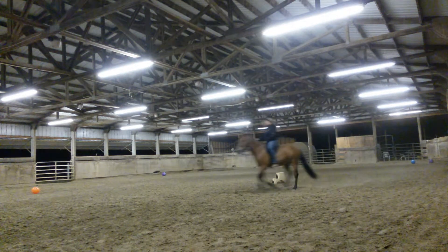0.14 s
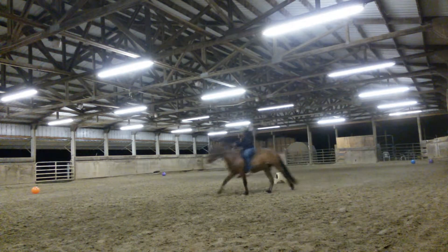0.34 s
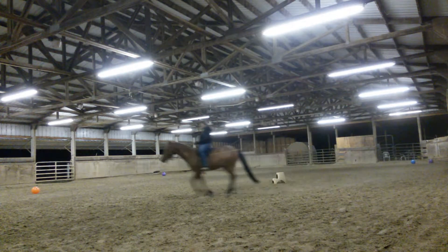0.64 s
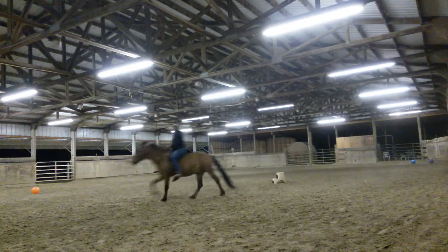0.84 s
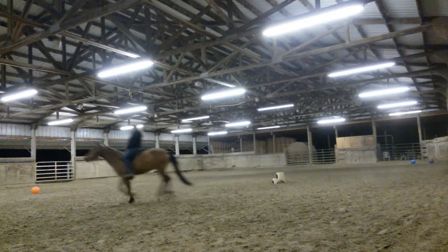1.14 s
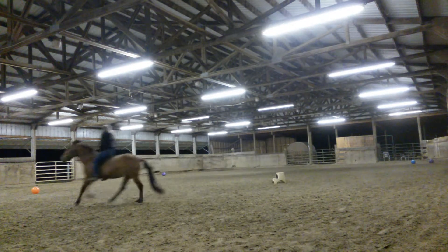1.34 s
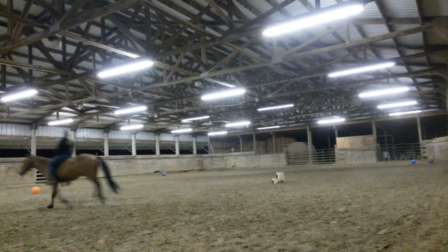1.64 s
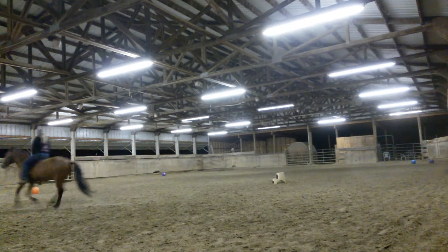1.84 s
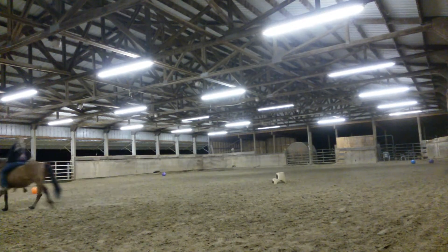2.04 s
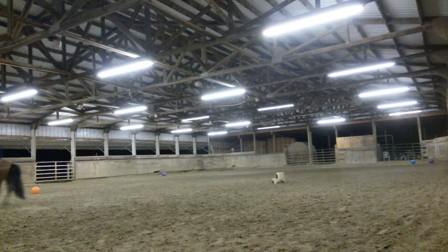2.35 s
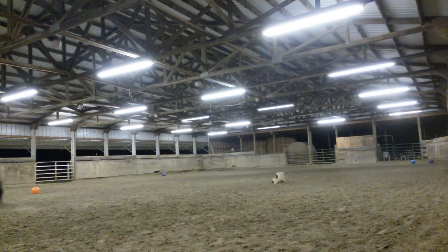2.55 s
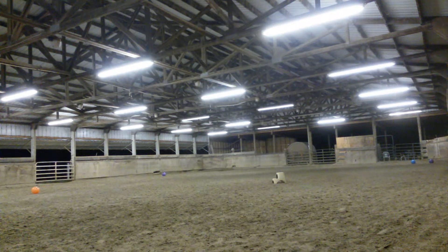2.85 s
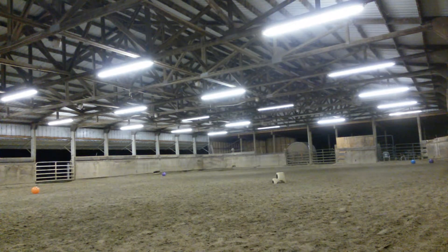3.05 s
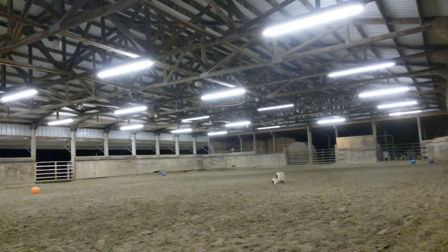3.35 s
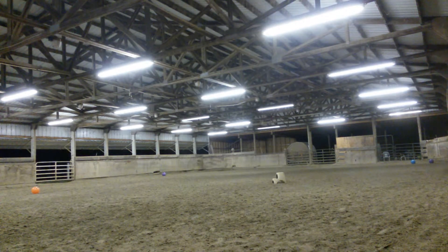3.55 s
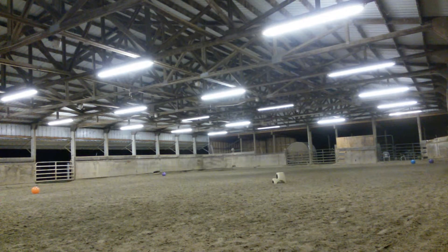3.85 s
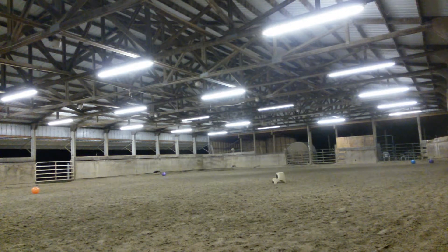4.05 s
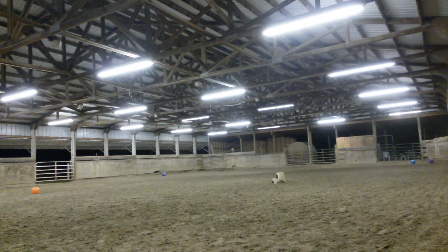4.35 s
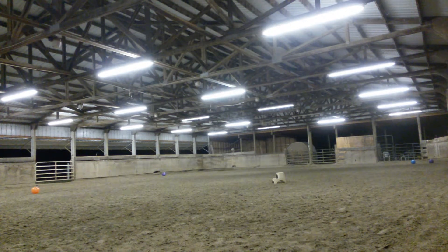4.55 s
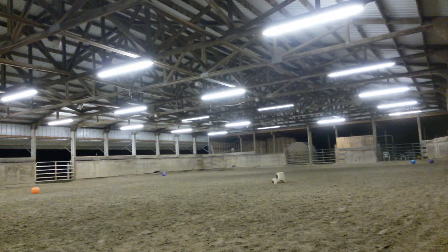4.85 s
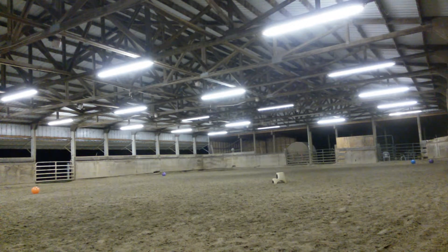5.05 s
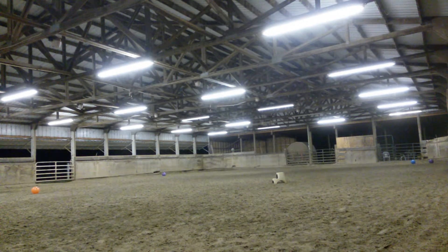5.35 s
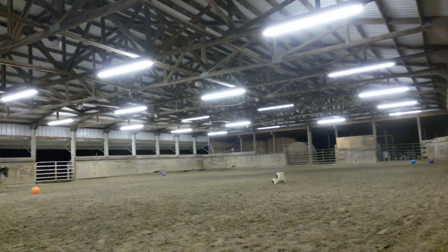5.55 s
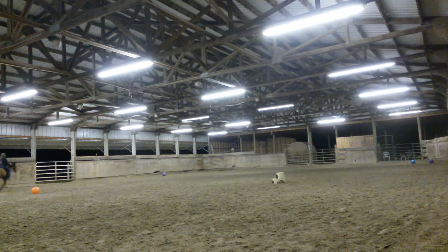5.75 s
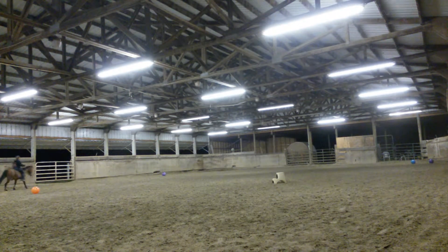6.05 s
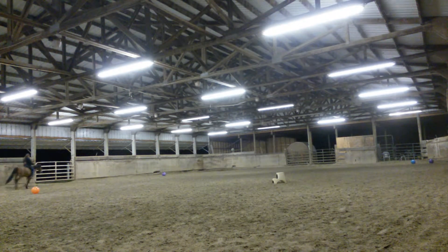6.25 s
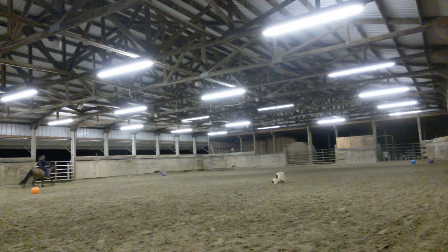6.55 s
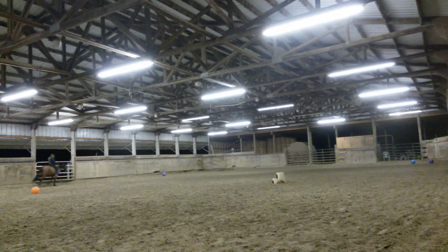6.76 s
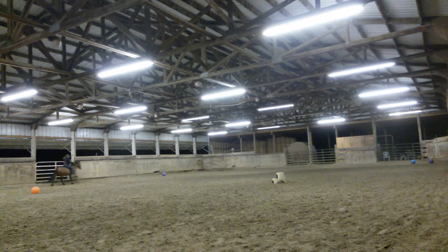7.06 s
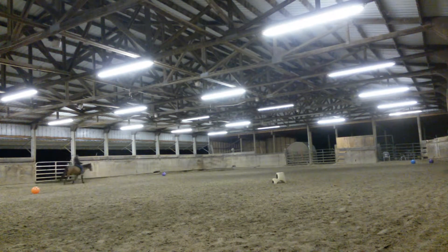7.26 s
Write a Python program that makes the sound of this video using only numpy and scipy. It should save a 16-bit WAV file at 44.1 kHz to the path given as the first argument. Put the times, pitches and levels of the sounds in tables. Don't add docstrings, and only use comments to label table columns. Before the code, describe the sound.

Soft, dull hoof thuds and gritty dirt spray pass close by with a bright metallic tack rattle, fade, then return fainter in an indoor arena.

```python
import sys
import numpy as np
from scipy import signal
from scipy.fft import rfft, irfft, next_fast_len
from scipy.io import wavfile
from scipy.ndimage import uniform_filter1d

SR = 44100
rng = np.random.default_rng(int(sys.argv[2]) if len(sys.argv) > 2 else 0)


def bounce(signal):
    frames = np.transpose(np.atleast_2d(signal))
    limited = np.clip(frames, -1, 1)
    pcm = np.round(limited * 32767).astype(np.int16)
    wavfile.write(sys.argv[1], SR, pcm)


def nominal_scale(level):
    x = np.asarray(level, float) / 20
    return 10 ** x


N = 326011

# (frequency [Hz], level [dB])
SCUFF_COLOUR = [(150, 3.5), (400, 7.5), (1000, 3), (2500, -2), (5000, -2.5), (9000, -8.5), (15000, -23)]
# (frequency [Hz], level [dB])
SPRAY_COLOUR = [(1500, -12.5), (3000, -6), (6000, -2), (10000, -2.5), (15000, 3)]


def level(x, db):
    return x * nominal_scale(db) / np.sqrt(np.mean(x ** 2))


def colour(x, points):
    hz, db = np.transpose(points)
    size = next_fast_len(N + 4096)
    f = np.maximum(np.arange(size // 2 + 1) * SR / size, 1)
    gain = nominal_scale(np.interp(np.log(f), np.log(hz), db))
    return irfft(rfft(x, size) * gain, size)[..., :N]


def band(x, lo_hz, hi_hz):
    return signal.sosfilt(signal.butter(2, [lo_hz, hi_hz], "band", fs=SR, output="sos"), x)


def add(out, s, x):
    i = max(int(s * SR), 0)
    out[..., i:i + x.shape[-1]] += x[..., :max(out.shape[-1] - i, 0)]


def clock(seconds):
    return np.arange(int(seconds * SR)) / SR


def alike(count, hz):
    mid, side = rng.standard_normal((2, count))
    treble = signal.sosfilt(signal.butter(2, hz, "high", fs=SR, output="sos"), side)
    side = 0.39 * side + 0.7 * treble
    return np.array([mid + side, mid - side])


def grit(scatter_db, share):
    sizes = nominal_scale(scatter_db * rng.exponential(size=N)) * (rng.random(N) < share)
    return level(uniform_filter1d(sizes, 24) * rng.standard_normal((2, N)), 0)


def bursts(s, lasts, db, rise, sag, fall):
    step_s = np.arange(0, N, 32) / SR
    since = step_s - np.asarray(s)[:, None]
    held = np.clip(since, 0, np.asarray(lasts)[:, None])
    falling = np.maximum(since, 0) - held
    sag = np.reshape(sag, (-1, 1))
    gain = nominal_scale(db[:, None] + rise * np.minimum(since, 0) - sag * held - fall * falling)
    return np.interp(np.arange(N) / SR, step_s, np.sqrt(np.sum(gain ** 2, axis=0)))


def hall(x, wet_db, builds_s=0.0028):
    t60_s, treble_t60_s = 0.92, 0.31
    t = clock(1.2)
    noise = alike(len(t), 610)
    low = signal.sosfilt(signal.butter(1, 1500, fs=SR, output="sos"), noise)
    tail = low * nominal_scale(-60 * t / t60_s) + (noise - low) * nominal_scale(-60 * t / treble_t60_s)
    tail = tail * np.minimum(t / builds_s, 1)
    tail = tail / np.sqrt(np.sum(tail ** 2, axis=1, keepdims=True))
    return x + nominal_scale(wet_db) * signal.fftconvolve(x, tail, axes=1)[:, :N]


def push(hz, lead_s):
    turn = (clock(.03) - lead_s) * hz
    return np.cos(2 * np.pi * turn + .5) * np.exp(-(turn / (.44 * np.sqrt(hz / 100))) ** 2)


def hoofs():
    # (time [s], peak [dB], thud pitch [Hz], carry of the flutter [dB], hard edge [dB])
    near_falls = [(0.009, -37.5, 203, -4, -7), (0.051, -36.5, 96.9, 20, -18), (0.119, -44, 87, 8, -14),
                  (0.374, -35.5, 111, -3, -12), (0.5, -33.5, 103, -3, -6.5), (0.804, -46, 88.8, 2, -13),
                  (0.923, -30.5, 109, 13, -7.5), (1.261, -48, 112, 9, -4), (1.373, -45.5, 94.5, -3, -2),
                  (1.503, -30, 192, 0, -13), (1.633, -41.5, 85.6, 2, -4.5), (1.944, -47.5, 96.9, 0.5, -0.5),
                  (2.069, -36.5, 115, 1, -9), (2.209, -33, 186, -2.5, -12.5), (2.524, -34.5, 186, -1, -15),
                  (2.636, -38.5, 101, -6.5, -2), (3.222, -49, 245, 15, -7), (3.35, -43, 105, 12, -11),
                  (3.784, -54, 182, 3, -19), (3.886, -50, 108, 1, -14)]
    # (time [s], peak [dB], thud pitch [Hz], carry of the flutter [dB], hard edge [dB])
    far_falls = [(4.38, -45, 240, 7, -12), (4.522, -46, 79, 12, -11), (4.798, -48.5, 77, 6, -13),
                 (4.931, -39.5, 110, 13, -28), (5.082, -36, 95, 18, -13), (5.131, -42.5, 220, 1, -17),
                 (5.213, -45.5, 89.5, 21, -20), (5.369, -41.5, 167, 10, -25), (5.52, -46, 97, 0, -9),
                 (5.659, -36.5, 165, 6, -12), (5.781, -46.5, 100, 8, -14), (5.943, -40, 124, 12, -12.5),
                 (6.082, -40, 172, 16, -11.5), (6.237, -39.5, 182, 5.5, -16), (6.528, -46.5, 169, 1, -13),
                 (6.641, -34, 197, 5, -11.5), (6.68, -36, 166, -1.5, -10.5), (6.791, -36.5, 103, -3, -16),
                 (6.848, -49, 157, 31, -11), (7.081, -41.5, 230, 4, -13), (7.12, -50.5, 171, 5, -3),
                 (7.227, -42.5, 117, -12, -1.5)]
    roof_s, roof_db = 0.0102, 6.5
    falls = near_falls + far_falls
    body, flutter, crisp = np.zeros((3, N))
    t = clock(.15)
    crunch = np.minimum(t / 0.0031, 1) * np.exp(-t / 0.019)
    edge = push(338, lead_s=0.00803) + nominal_scale(-6.5) * push(615, lead_s=0.0087)
    for (s, db, hz, carry_db, edge_db), luck in zip(falls, rng.standard_normal((len(falls), 16))):
        thud = push(hz, lead_s=0.00804) + nominal_scale(edge_db) * edge
        add(body, s - .005, nominal_scale(db - 5.5) * thud)
        for k in range(6):
            uneven = k > 0
            late = roof_s * (k + 1) + 0.0019 * luck[k + 8] * uneven
            return_db = db - 7.5 + roof_db + 0.82 * luck[k] * uneven + min(carry_db - 9.5 * k, 0)
            add(flutter, s - .005 + late, nominal_scale(return_db) * thud)
        far_db = -1 if s >= far_falls[0][0] else 0
        add(crisp, s, nominal_scale(-59.5 + 0.76 * (db + 37.0) + far_db) * crunch)
    crisp = crisp * level(band(alike(N, 930), 340, 800), 0)
    return hall(body + crisp, -2.5, builds_s=0.043) + flutter


def clods():
    # (time [s], peak [dB], pitch [Hz], fade [s])
    breaks = [(0.243, -46, 2140, 0.055), (0.382, -50, 961, 0.06), (0.498, -53, 929, 0.06),
              (0.669, -47, 899, 0.067), (0.777, -46, 834, 0.065), (0.807, -42.5, 1970, 0.06),
              (0.92, -53, 1950, 0.055), (1.016, -48, 1220, 0.06), (1.169, -43, 1080, 0.067),
              (1.235, -44.5, 2200, 0.068), (1.506, -39, 1200, 0.069), (1.705, -56, 896, 0.06),
              (1.818, -57, 1260, 0.055), (1.882, -46, 2700, 0.055), (1.945, -58, 1010, 0.054),
              (2.057, -60, 1120, 0.06), (2.438, -52, 2780, 0.06), (3.028, -50, 802, 0.068),
              (3.096, -46, 2460, 0.065), (3.21, -59, 905, 0.074), (3.789, -61, 802, 0.06),
              (3.938, -52, 1470, 0.06), (4.413, -52, 1140, 0.06), (4.806, -61, 1070, 0.06)]
    # (time [s], peak [dB], pitch [Hz], t60 [s])
    thumps = [(0.376, -37, 315, 0.072), (0.453, -51, 253, 0.06), (0.501, -46, 217, 0.05),
              (0.749, -49, 323, 0.06), (0.924, -46, 345, 0.052), (1.015, -45, 285, 0.069),
              (1.288, -56, 280, 0.06), (1.38, -44, 221, 0.069), (1.513, -42, 250, 0.054),
              (1.632, -46, 366, 0.06), (1.952, -55, 405, 0.055), (2.08, -40.5, 287, 0.068),
              (2.206, -36, 222, 0.079), (2.249, -47, 238, 0.06), (2.524, -49, 221, 0.054),
              (2.564, -52, 242, 0.06), (2.627, -41, 226, 0.065), (2.732, -53, 253, 0.06),
              (3.219, -52, 248, 0.06), (3.785, -56, 240, 0.067), (3.833, -52, 245, 0.06),
              (4.362, -49, 229, 0.06), (4.932, -51, 256, 0.06), (4.963, -52, 242, 0.06),
              (5.087, -40, 260, 0.073), (5.652, -54, 221, 0.06), (5.689, -47, 237, 0.06),
              (5.958, -51, 291, 0.06), (6.081, -48, 224, 0.06), (6.252, -48, 221, 0.06),
              (6.531, -55, 221, 0.06), (6.652, -42, 254, 0.066), (6.752, -51, 240, 0.06),
              (6.799, -49, 242, 0.06), (7.091, -45, 240, 0.06), (7.233, -42, 270, 0.069)]
    out = np.zeros((2, N))
    t = clock(.12)
    for (s, db, hz, fade), crumbs in zip(breaks, rng.standard_normal((len(breaks), 2, len(t)))):
        shape = nominal_scale(db - 6.5 - 60 * t / fade) * np.minimum(t / 0.0079, 1)
        add(out, s, shape * level(band(crumbs, hz * 1.03, hz * 1.09), 0))
    for s, db, hz, t60 in thumps:
        shape = nominal_scale(db - 4.5 - 60 * t / t60) * (1 - np.exp(-t / 0.005))
        add(out, s, shape * np.sin(2 * np.pi * hz * t))
    return out


def kicks():
    # (time [s], peak [dB], middle range [dB], fade [s])
    kicked = [(0.041, -52, -24, 0.14), (0.087, -51, -22, 0.062), (0.155, -60, -28, 0.098),
              (0.2527, -49.5, -10, 0.16), (0.375, -49, -9, 0.13), (0.455, -47, -34, 0.055),
              (0.5741, -54, -11, 0.21), (0.619, -49, -17, 0.037), (0.663, -58, -2, 0.22),
              (0.7775, -48, -10, 0.16), (0.9145, -53, -7, 0.21), (1.292, -48, -12, 0.063),
              (1.3793, -59, -36, 0.2), (1.511, -47.5, -3, 0.15), (1.697, -54, -16, 0.11),
              (1.872, -54.5, -10, 0.36), (1.942, -52, -5, 0.15), (2.068, -52.5, -7, 0.18),
              (2.186, -46, -33, 0.19), (2.4175, -40.5, -41, 0.19), (2.634, -57.5, -1.5, 0.12),
              (2.7511, -62, -14, 0.32), (3.004, -51, -28, 0.094), (3.203, -58.5, -6, 0.21),
              (3.344, -51.5, -27, 0.1), (3.5743, -58, -16, 0.083), (3.938, -58, -3, 0.16),
              (4.7112, -59, -39, 0.11), (4.853, -54.5, -27, 0.17), (6.6588, -59, -15, 0.073)]
    # (time [s], peak [dB], fade [s])
    drags = [
        (1.1894, -48, 0.066),
        (2.6494, -62, 0.077),
        (3.0394, -58, 0.081),
        (3.093, -49, 0.11),
        (3.6694, -74, 0.089),
        (3.7885, -55.5, 0.1),
        (4.8006, -56.5, 0.18),
        (4.9794, -53.5, 0.075),
    ]
    # (time [s], peak [dB])
    snapped = [(0.0877, -40), (0.155, -39), (0.4559, -41), (0.6215, -40), (0.6672, -40), (0.7772, -37),
               (0.9123, -41), (1.292, -41), (1.3793, -39), (1.4012, -40), (1.51, -43), (2.1869, -39),
               (2.4174, -28), (3.0041, -43), (3.3443, -47), (3.5743, -44), (4.7112, -51), (4.8539, -48),
               (5.0769, -50)]
    fine, coarse, snaps = np.zeros(N), np.zeros(N), np.zeros((2, N))
    t = clock(.4)
    for s, db, middle_db, fade in kicked:
        shape = nominal_scale(db - 5.0 - 60 * t / fade)
        add(fine, s, shape)
        add(coarse, s, shape * nominal_scale(middle_db))
    for s, db, fade in drags:
        add(coarse, s, nominal_scale(db - 12.0 - 60 * t / fade) * np.minimum(t / 0.0024, 1))
    crackle = np.exp(-(t[:64] % 0.0009) / 0.00018)
    for (s, db), crack in zip(snapped, rng.standard_normal((len(snapped), 2, 64))):
        add(snaps, s, nominal_scale(db - 3) * level(crack * crackle, -1.5))
    fine = nominal_scale(6.5) * fine * level(colour(grit(1.2, 0.47), SPRAY_COLOUR), 0)
    coarse = nominal_scale(10.5) * coarse * level(colour(grit(0.92, 0.18), SCUFF_COLOUR), 0)
    return fine + coarse + band(snaps, 7500, 19000)


def strides():
    # (time [s], on the ground [s], rumble [dB], dirt [dB])
    landings = [(0.0, 0.34, -46.5, -67), (0.4, 0.3, -58, -64), (0.95, 0.53, -52, -61),
                (1.53, 0.32, -56.5, -63.5), (2.1, 0.21, -55.5, -65), (2.72, 0.1, -61, -67.5),
                (3.24, 0.22, -56, -67), (3.8, 0.25, -59.5, -70), (4.4, 0.42, -59.5, -68.5),
                (4.95, 0.3, -57, -68), (5.52, 0.26, -61, -70.5), (6.09, 0.2, -58, -69.5),
                (6.66, 0.23, -64, -70.5), (7.09, 0.46, -57, -74.5)]
    # (time of the peak [s], scuff [dB], fine spray [dB])
    throws = [(0.0, -64, -61), (0.26, -64.5, -67), (0.49, -68, -55), (0.81, -60.5, -56.5), (0.94, -81, -60),
              (1.06, -55.5, -52.5), (1.21, -62.5, -77), (1.39, -63, -52), (1.52, -76, -55.5),
              (1.96, -66, -61), (2.09, -74.5, -59.5), (2.5, -67, -57.5), (2.55, -65.5, -58.5),
              (2.66, -65.5, -61.5), (3.04, -62.5, -58.5), (3.11, -64.5, -61.5), (3.23, -64, -75),
              (3.37, -64.5, -71), (3.67, -63, -64.5), (3.8, -66, -70), (3.94, -64.5, -70),
              (4.24, -70, -67.5), (5.0, -68, -68), (5.38, -71, -70), (5.7, -68, -83), (5.97, -70, -74),
              (6.42, -93, -72), (6.66, -81, -77), (7.23, -70, -78)]
    # (frequency [Hz], level [dB])
    rumble_colour = [(25, -26), (50, 4), (95, 2), (140, -8.5), (190, 4.5), (300, -5.5), (600, -26.5),
                     (1500, -33)]
    s, ground, rumble_db, dirt_db = np.transpose(landings)
    throw_s, scuff_db, spray_db = np.transpose(throws)
    hang = np.full(len(throws), 0.01)
    stirred = bursts(s, ground, dirt_db, rise=230, sag=9.5, fall=36)
    dust = bursts(s, ground, dirt_db - 3.5, rise=340, sag=5.4, fall=110)
    thrown_coarse = bursts(throw_s, hang, scuff_db, rise=330, sag=10, fall=280)
    thrown_fine = bursts(throw_s, hang, spray_db, rise=330, sag=10, fall=280)
    scuff = np.hypot(stirred, thrown_coarse) * level(colour(grit(0.65, .2), SCUFF_COLOUR), 6.9)
    spray = np.hypot(dust, thrown_fine) * level(colour(grit(0.47, 0.31), SPRAY_COLOUR), 7.44)
    weight = bursts(s, ground, rumble_db, rise=340, sag=18, fall=17.5)
    rumble = weight * level(colour(alike(N, 350), rumble_colour), 0.71)
    return scuff + spray + rumble


def chime(s, db, hz, t60, rise):
    out, chance = np.zeros((2, N)), rng.standard_normal((len(s), 2))
    side = np.array([[1], [-1]])
    for s0, db0, hz0, t600, (lead, lean) in zip(s, db, hz, t60, chance):
        t = clock(1.4 * t600)
        shape = nominal_scale(db0 - 60 * t / t600) * (1 - np.exp(-t / rise))
        phase = np.pi / 4 * np.sign(lead) * side
        add(out, s0, shape * nominal_scale(1.93 * lean * side) * np.sin(2 * np.pi * hz0 * t + phase))
    return out


def chatter(gain, hz, spread_hz, t60, scatter_db, count):
    s = np.sort(rng.random(count)) * N / SR
    size, pitch = rng.exponential(size=count), rng.standard_normal(count)
    knocks = chime(s, scatter_db * size, hz + spread_hz * pitch, np.full(count, t60), rise=0.00013)
    return gain * level(knocks, 0)


def rattle():
    # (time [s], peak [dB], pitch [Hz])
    knocks = [(0.0303, -29, 6530), (0.0887, -27.5, 6470), (0.1755, -42, 6600), (0.2219, -33, 6500),
              (0.2883, -38, 6560), (0.387, -35.5, 6630), (0.4045, -35, 6520), (0.4419, -36, 6480),
              (0.4963, -39, 6600), (0.5611, -40, 6550), (0.613, -40, 6320), (0.6799, -30, 6480),
              (0.7662, -46, 6410), (0.9527, -33, 6550), (0.9827, -35, 6450), (1.0016, -37, 6560),
              (1.038, -34, 6520), (1.128, -31.5, 6330), (1.1618, -29.5, 6490), (1.2346, -43, 6430),
              (1.256, -43, 6320), (1.275, -33, 6470), (1.3404, -32.5, 6500), (1.4112, -41, 6540),
              (1.504, -42, 6500), (1.5633, -36, 6530), (1.5868, -38, 6370), (1.6142, -44, 6480),
              (1.7175, -32, 6460), (1.7654, -38, 6510), (1.7828, -36, 6310), (1.8547, -35, 6480),
              (2.1575, -29.5, 6450), (2.1999, -33, 6330), (2.2418, -42, 6300), (2.2857, -31.5, 6430),
              (2.4728, -34.5, 6450), (2.7332, -41, 6470), (2.8345, -45, 6370), (2.9168, -47, 6430),
              (3.4729, -37.5, 6590), (4.0971, -39.5, 6450), (4.406, -43.5, 6640), (4.5955, -40, 6370),
              (4.6433, -39, 6490), (4.8803, -44.5, 6480), (5.006, -50, 6550), (5.1372, -38, 6520),
              (5.3058, -42, 6600), (5.477, -48, 6630), (5.5064, -49, 6480), (5.5184, -43, 6500),
              (5.5722, -31.5, 6440), (5.6321, -48, 6560), (5.7349, -37, 6520), (5.8895, -43, 6460),
              (6.1275, -51, 6410), (6.1529, -42, 6480), (6.1739, -50, 6600), (6.3185, -39, 6400)]
    # (time [s], lasts [s], level [dB], sag [dB/s])
    shakes = [(0.0, 0.37, -35.5, 73), (0.401, 0.34, -43.5, 15), (0.955, 0.45, -45, 18),
              (1.538, 0.33, -47, 5), (2.14, 0.35, -43, 40), (2.718, 0.3, -56, -3), (3.308, 0.18, -55, -26),
              (3.845, 0.28, -59, -2), (4.404, 0.36, -54, 1), (5.0, 0.37, -50, 26), (5.533, 0.4, -49, 30),
              (6.113, 0.13, -53.5, -49), (6.462, 0.091, -59, 5), (6.722, 0.28, -54, 36),
              (7.064, 0.085, -63, 5), (7.25, 0.2, -64, -1)]
    s, db, hz = np.transpose(knocks)
    hard = chime(s, db + 2.5, hz, np.full(len(s), .03), rise=.0012)
    shake_s, lasts, shake_db, sag = np.transpose(shakes)
    shaking = bursts(shake_s, lasts, shake_db, rise=420, sag=sag, fall=112) + nominal_scale(-67)
    return hard + chatter(nominal_scale(-4.0) * shaking, 6500, 135, .03, 1.8, count=2000)


def loose_ring():
    # (time [s], lasts [s], level [dB])
    spells = [(0.262, 0.01, -58), (0.502, 0.014, -49.5), (0.8, 0.03, -70), (0.946, 0.0083, -82),
              (1.078, 0.077, -60), (1.136, 0.047, -64), (1.38, 0.02, -57), (1.72, 0.17, -57.5),
              (2.048, 0.13, -56.5), (2.435, 0.033, -51), (3.19, 0.089, -61), (3.78, 0.06, -58),
              (4.235, 0.027, -66), (4.486, 0.077, -58.5), (4.803, 0.018, -62), (4.957, 0.03, -65),
              (6.72, 0.064, -60)]
    shaking = bursts(*np.transpose(spells), rise=280, sag=2.4, fall=310)
    return chatter(nominal_scale(-9.0) * shaking, 4730, 115, .045, 1.0, count=2000)


def buckles():
    # (time [s], peak [dB], pitch [Hz], t60 [s])
    pings = [(0.155, -28, 12000, 0.013), (0.4559, -33, 11300, 0.02), (0.6215, -29, 9500, 0.03),
             (0.6669, -29, 9800, 0.029), (1.0181, -33.5, 11500, 0.05), (1.3793, -27, 9430, 0.071),
             (1.697, -36, 9410, 0.062), (2.542, -38, 5300, 0.05), (2.596, -41, 5330, 0.045),
             (2.596, -41, 4650, 0.045), (2.634, -40, 5160, 0.057), (1.386, -36, 5360, 0.06),
             (2.7511, -41, 9800, 0.05), (5.4445, -46, 5330, 0.03), (5.4445, -54, 4700, 0.03),
             (5.687, -44, 5530, 0.03)]
    s, db, hz, t60 = np.transpose(pings)
    return chime(s, db - 13.5, hz, np.minimum(t60, 1 / 16), rise=0.00068)


def building_hush():
    # (frequency [Hz], level [dB])
    hush_colour = [(20, -9), (100, 9.5), (250, -9.5), (600, -12), (2200, -25.5), (7000, -37.5),
                   (15000, -77)]
    return level(colour(alike(N, 830), hush_colour), -61.5)


def scene():
    dirt = hall(kicks() + clods(), -6.5) + strides()
    tack = hall(rattle() + loose_ring(), -4.0) + buckles()
    return hoofs() + dirt + tack + building_hush()


def roll_off(x):
    return signal.sosfilt(signal.butter(12, 15300, fs=SR, output="sos"), x)


def record(dry):
    # (frequency [Hz], level [dB])
    port_colour = [(60, 0), (1000, 0), (3500, 1), (4800, 2), (5600, 5.5), (7000, 1.5), (9000, -1.5),
                   (11000, 0.5), (12500, 2.5), (14500, -3)]
    # (frequency [Hz], difference [dB])
    port_lean = [(40, 0), (90, -2.5), (300, -2), (700, 0), (2500, 1.5), (4000, 5), (4700, 13), (5500, 12),
                 (6400, 4), (8000, -2), (10000, -9), (12500, -17), (14500, -6)]
    lean = np.array(port_lean)
    ports = np.array([colour(dry[0], lean * [1, .5]), colour(dry[1], lean * [1, -.5])])
    hiss = nominal_scale(-64) * rng.standard_normal((2, N))
    ports = colour(ports, port_colour) + hiss
    ports = signal.sosfilt(signal.ellip(7, .3, 34, 14400, fs=SR, output="sos"), ports)
    return roll_off(ports)


dry = scene()
out = record(dry)
bounce(out)
```